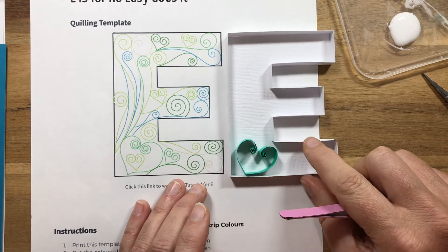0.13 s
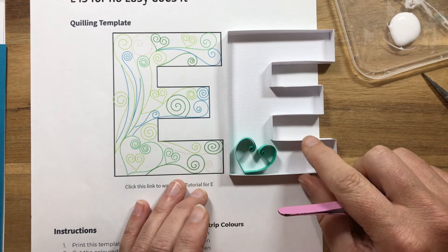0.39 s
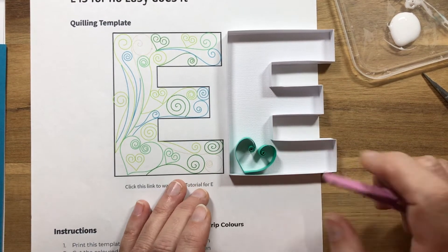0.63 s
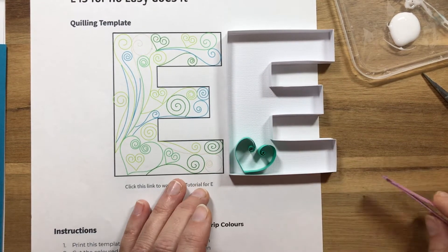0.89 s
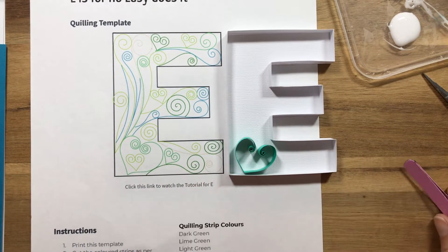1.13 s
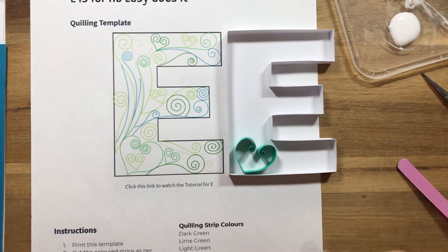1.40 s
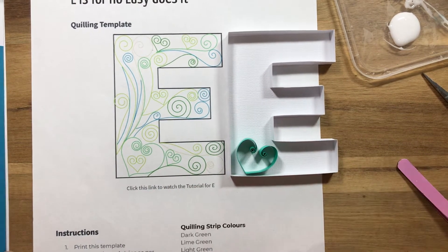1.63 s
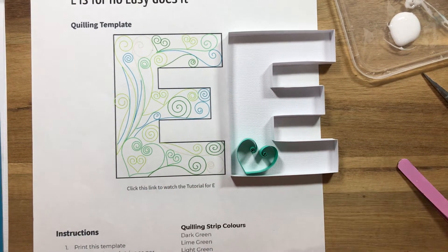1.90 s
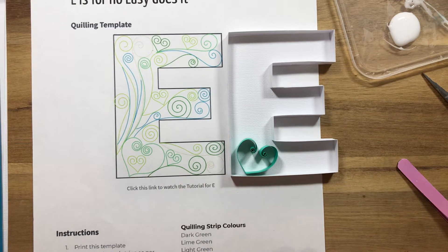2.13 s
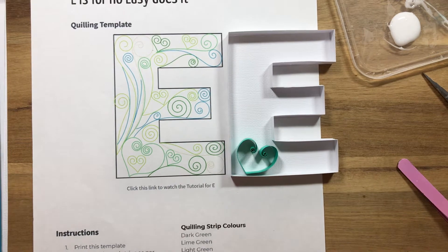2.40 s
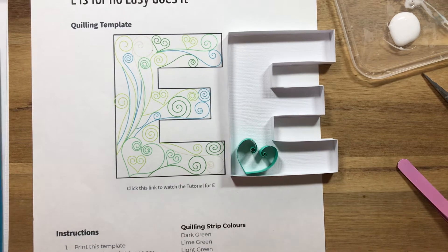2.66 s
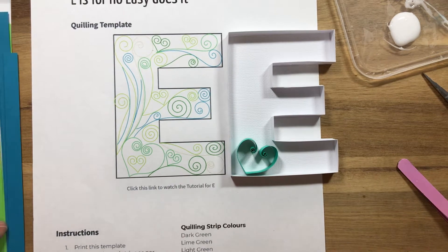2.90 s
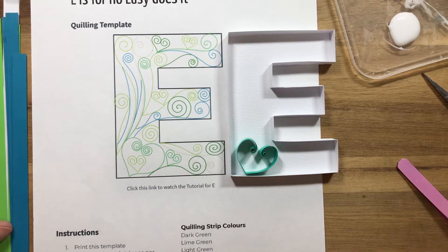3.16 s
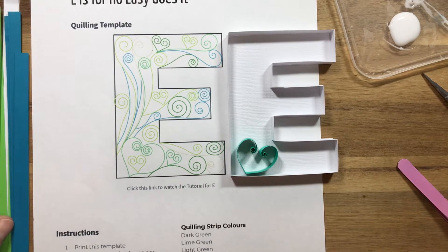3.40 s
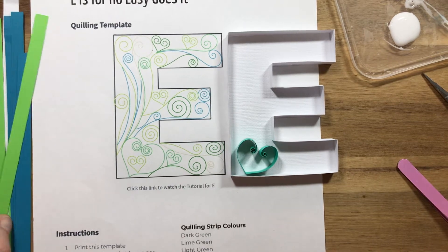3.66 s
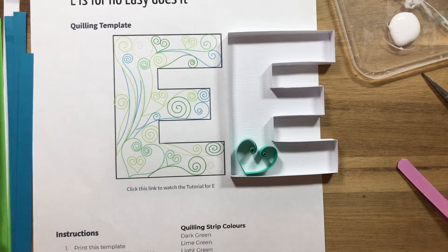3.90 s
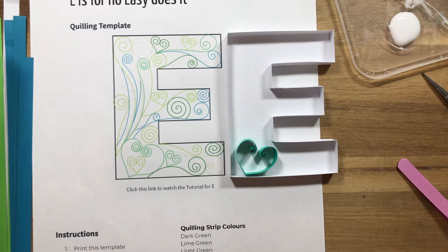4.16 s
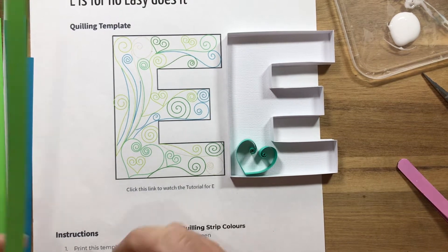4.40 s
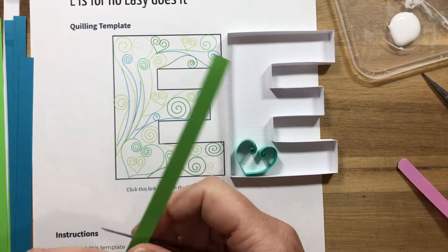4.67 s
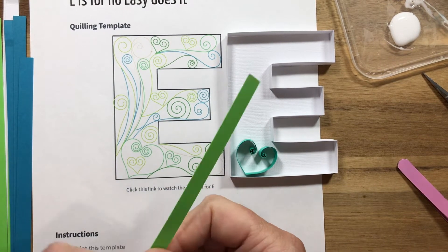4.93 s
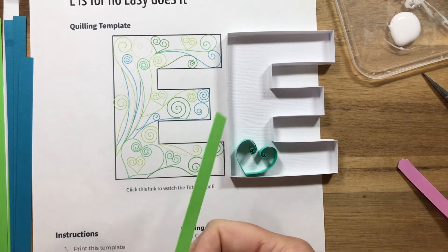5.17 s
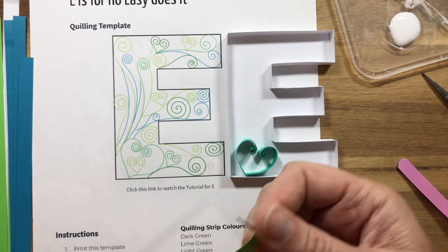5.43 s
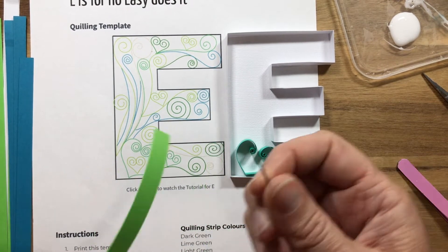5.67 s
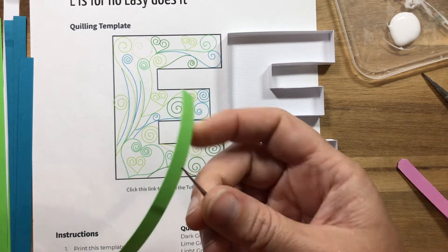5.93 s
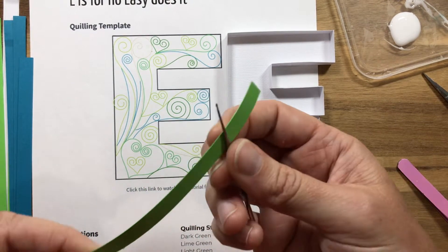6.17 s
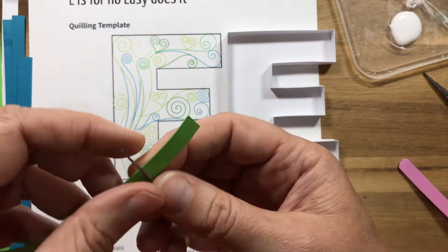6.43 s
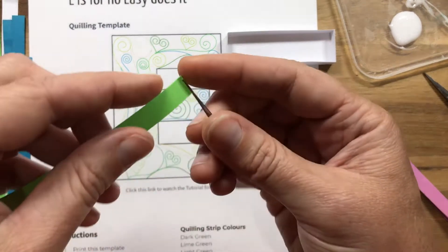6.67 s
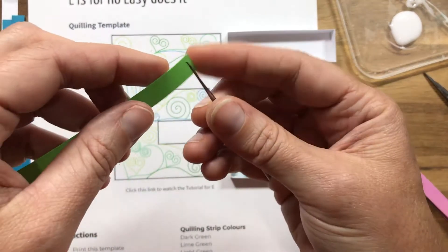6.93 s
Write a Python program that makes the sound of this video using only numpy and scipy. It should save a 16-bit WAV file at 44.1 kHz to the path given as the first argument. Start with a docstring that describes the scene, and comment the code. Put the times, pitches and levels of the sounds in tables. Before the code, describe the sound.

A quiet small room with a steady low hum and soft hiss, heard close up. Faint paper rubbing opens, with one crisp tick at about 0.5 s. At 1.2 s steel tweezers drop on a wooden table, a loud, bright, hard rattle of rapid bounces over within 0.2 s. Soft brushing and a tiny thin whistle follow around 1.5 s. From 2.3 to 4 s paper strips are slid from a stack: dry, papery strokes, dull knocks near 2.5 and 3.2 s, low rubbing on the table and small ticks. Sharp snaps come at 4.05 and 4.15 s, a light woody tap at 4.3 s, then near quiet with faint rustles. Between 5.1 and 5.5 s the strip is drawn through the fingers in swelling strokes with a sinking friction hum. From 5.9 to 7 s irregular small clicks, creases and short scrapes as it is bent round a needle.

```python
"""Steel tweezers drop on a wooden table and rattle to rest: each bounce is a rough contact ringing modes of
table and steel. Around them hands work with paper strips, slid from a stack, drawn through the fingers and
bent round a needle: strokes and a sinking hum of friction noise, and ticks of snapped noise. Under these lie
knocks, a tap and rubbing on the table and thin gliding whistles. All leave a short diffuse tail in a quiet
room of shaped noise with a mains hum."""
import sys
import numpy as np
from scipy import signal
from scipy.io import wavfile
from scipy.ndimage import uniform_filter1d

SR = 44100
rng = np.random.default_rng(int(sys.argv[2]) if len(sys.argv) > 2 else 0)


def convert_level_to_amplitude(level_db):
    """Map a level in decibels to its linear amplitude factor."""
    exponent = np.asarray(level_db, float) / 20
    return 10 ** exponent


def transcribe(signal):
    """Save signal, clipped to [-1, 1], as a 16-bit WAV file at the path in sys.argv[1]."""
    frames = np.atleast_2d(signal).T
    limited = np.clip(frames, -1, 1)
    pcm = np.round(limited * 32767).astype(np.int16)
    wavfile.write(sys.argv[1], SR, pcm)


N = 311346  # length in samples


def evened(x):
    """Scales to rms 1."""
    return x / np.sqrt(np.mean(abs(x) ** 2) + 1e-20)


def add(mix, start_s, sound):
    """Mixes a sound in at a time in seconds."""
    part = mix[round(start_s * SR):][:len(sound)]
    part += sound[:len(part)]


def drift(points_per_s):
    """Slow random wander of rms 1."""
    points = rng.standard_normal(int(N / SR * points_per_s) + 2)
    return evened(signal.resample(points, N))


def resonate(x, hz, width_hz):
    """A resonance of gain 1 that follows the curve hz: shift it down to 0 Hz, smooth, shift back up."""
    turn = np.exp(2j * np.pi * np.cumsum(hz * np.ones(len(x))) / SR)
    r = np.exp(-np.pi * width_hz / SR)
    return 2 * (turn * signal.lfilter([1 - r], [1, -r], x / turn)).real


def resonate_twice(x, hz, width_hz):
    """Two equal resonances in a row, for steeper skirts."""
    return resonate(resonate(x, hz, width_hz), hz, width_hz)


def grains(per_s, spread_db, bed):
    """Friction: a dense bed of noise broken up by fibres that catch and let go."""
    strength = convert_level_to_amplitude(spread_db * np.minimum(rng.exponential(1, N), 4))
    catch = (rng.random(N) < per_s / SR) * strength
    catch = signal.oaconvolve(catch, np.exp(-np.arange(300) / 55.0))[:N]
    return evened(rng.standard_normal(N) * (bed + evened(catch)) * convert_level_to_amplitude(1.8 * drift(60)))


# tonal balance of the room's noise: (frequency [Hz], relative level [dB])
ROOM_SPECTRUM = [(20, -24), (45, 1.5), (75, 1.5), (130, -4.5), (266, -7), (450, -13), (700, -13.5),
                 (950, -12), (1300, -14.5), (2330, -19.5), (3700, -22), (6000, -24), (9080, -28.5),
                 (14000, -27), (15700, -29), (16300, -63)]
# hum and faint whines: (frequency [Hz], mean level [dB rms], waver [dB])
STEADY_TONES = [(100.6, -58.5, 0.27), (56.2, -68, 2.5), (13750, -92, .6)]


def room_tone():
    """Air, distant machines and microphone hiss as shaped noise, with wavering sines for hum and whines."""
    level_db = -62  # rms of the noise above 120 Hz
    hz, _, z = signal.stft(rng.standard_normal(N), SR, nperseg=4096)
    f, db = np.transpose(ROOM_SPECTRUM)
    z *= convert_level_to_amplitude(np.interp(np.log(hz + 1), np.log(f + 1), db))[:, None]
    high = signal.istft(z * (hz > 120)[:, None], SR, nperseg=4096)[1][:N]
    out = signal.istft(z, SR, nperseg=4096)[1][:N] * convert_level_to_amplitude(level_db) / high.std()
    t = np.arange(N) / SR
    for tone_hz, db, waver_db in STEADY_TONES:
        level = convert_level_to_amplitude(db + waver_db * np.clip(drift(4.2), -2, 2))
        out += np.sqrt(2) * level * np.sin(2 * np.pi * (tone_hz * t + rng.random()))
    return out


def room_tail(x):
    """Short diffuse tail of decaying noise; the treble dies first."""
    hz, t, z = signal.stft(rng.standard_normal(SR // 2), SR, nperseg=256)
    t60_s = 0.26 / (1 + hz[:, None] / 9000)
    tail = signal.istft(z * convert_level_to_amplitude(-60 * t / t60_s), SR, nperseg=256)[1]
    tail[:130] = 0  # first reflection after 3 ms
    return signal.fftconvolve(x, tail / np.linalg.norm(tail))[:N]


# thin short glides: (start [s], length [s], start frequency [Hz], frequency neared [Hz], sine level [dB rms])
WHISTLE_GLIDES = [(1.466, 0.06, 2385, 2570, -60), (3.28, 0.074, 2270, 2550, -62),
                  (6.919, 0.026, 1356, 1277, -62.5)]


def whistles():
    """Short near-sine glides that flutter, with a thread of narrow noise on the same pitch."""
    out = np.zeros(N)
    for start, length, start_hz, end_hz, db in WHISTLE_GLIDES:
        u = np.arange(round(length * SR)) / (length * SR)
        hz = end_hz + (start_hz - end_hz) * np.exp(-3.5 * u)
        airy = evened(resonate(rng.standard_normal(len(u)), hz, 90.))
        tone = np.sin(2 * np.pi * np.cumsum(hz) / SR) + 0.34 * airy
        swell = np.sin(np.pi * u) ** 0.24
        flutter = convert_level_to_amplitude(db + 1.7 * drift(59)[:len(u)])
        add(out, start, np.sqrt(2) * flutter * tone * swell)
    return out


# dull knocks through the table: (time of the swell's top [s], relative level [dB], lowest frequency [Hz])
TABLE_KNOCKS = [(2.482, -34.5, 82), (3.101, -50, 250), (3.212, -37, 149)]
# partials of every knock: (multiple of the lowest frequency [ratio], level [dB])
KNOCK_PARTIALS = [(1, 0), (1.6, -9), (2.15, -8.5)]
# the needle handle taps the table once: (time [s], peak level [dB])
HANDLE_TAP = (4.3328, -27.5)
# what the tap rings: (frequency [Hz], relative level [dB], t60 [s])
HANDLE_TAP_MODES = [(292, -5, 0.07), (640, -5.5, 0.042), (1100, -36, 0.022), (1438, 10, 0.027),
                    (1940, -7, 0.016), (2870, 1, 0.02), (3340, -0.5, 0.018), (5000, -3, 0.016),
                    (6200, -6, 0.013)]
# forearms rub the table top, one list per rub: (time [s], level [dB])
FOREARM_RUBS = [
    [(1.4, -60), (2.204, -75.5), (2.27, -97), (2.4, -79)],
    [(2.9, -96), (3.18, -67), (3.868, -68), (4.0, -101)],
    [(5.3, -75), (5.36, -67), (6.0, -82)],
]


def table():
    """Dull swelling knocks, one wooden tap, and low rubbing noise near the table's own resonance."""
    out, t = np.zeros(N), np.arange(SR // 8) / SR
    for s, level_db, hz in TABLE_KNOCKS:
        swell = np.e * t / 0.019 * np.exp(-t / 0.0071)
        partials = sum(convert_level_to_amplitude(db) * np.sin(2 * np.pi * k * hz * t) for k, db in KNOCK_PARTIALS)
        add(out, s - .008, convert_level_to_amplitude(level_db) * swell * partials)

    tap = sum(convert_level_to_amplitude(db - 60 * t / t60) * np.sin(2 * np.pi * hz * t) for hz, db, t60 in HANDLE_TAP_MODES)
    tap = tap * np.minimum(t / 0.00064, 1)  # soft onset
    tap_s, tap_db = HANDLE_TAP
    add(out, tap_s, convert_level_to_amplitude(tap_db) * tap / abs(tap).max())

    rub = evened(resonate_twice(rng.standard_normal(N), 258.0, 105.0))
    for curve in FOREARM_RUBS:
        s, db = np.transpose(curve)
        t = np.arange(s[0], s[-1], 1 / SR)
        add(out, s[0], convert_level_to_amplitude(np.interp(t, s, db)) * rub[round(s[0] * SR):][:len(t)])
    return out


# pulls of the taut strip between the fingers:
# (start [s], length [s], lower mode level [dB], lower mode start [Hz], frequency it nears [Hz])
STRIP_PULLS = [(3.08, .065, -56.5, 1460, 1360), (3.189, .055, -57, 1500, 1410),
               (5.102, 0.1, -66, 1100, 800), (5.188, 0.11, -59, 1170, 750), (5.296, 0.097, -54, 1450, 770),
               (5.394, 0.083, -53.5, 1300, 794)]


def draw_hum():
    """Friction drives two modes of the taut strip; they sink during each pull as the free length grows."""
    upper_hz, upper_sag = 2850., .17  # start, and the share it sinks by
    out, friction = np.zeros(N), grains(per_s=300., spread_db=1.0, bed=3.1)
    for start, length, db, start_hz, end_hz in STRIP_PULLS:
        u = np.arange(round(length * SR)) / (length * SR)
        low_hz = start_hz + (end_hz - start_hz) * np.tanh(2.2 * u)
        high_hz = upper_hz * (1 - upper_sag * u)
        rub = friction[round(start * SR):][:len(u)]
        lower = evened(resonate_twice(rub, low_hz, 260.0))
        upper = evened(resonate_twice(rub, high_hz, 420.))
        swell = np.sin(np.pi * u) ** 0.24
        add(out, start, convert_level_to_amplitude(db) * swell * (lower + convert_level_to_amplitude(-3.) * upper))
    return out


# the curl of the strip, which rings in the ticks and colours the strokes:
# (time [s], resonance [Hz], strength in the strokes [dB])
STRIP_CURL = [(0, 5500, 3), (2.35, 5300, 2), (2.62, 5050, 3), (2.8, 5570, -1.5), (3.2, 5300, 5),
              (3.56, 4770, 4), (3.7, 5450, 2), (3.8, 4620, 14), (3.99, 4800, 13.5), (4.04, 4800, 3),
              (4.2, 5000, 7), (4.66, 5000, 15), (5.0, 5800, 5), (5.46, 5550, 7.5), (5.65, 6100, 13),
              (5.99, 6900, 11), (6.04, 6100, 16), (6.17, 5900, 14), (6.24, 4600, 9), (6.36, 4800, 9),
              (6.39, 5880, 19), (6.55, 5740, 1.5), (7.06, 5500, 16)]
# ticks of nails, needle and paper creases:
# (time [s], peak level of the middle [dB], low tap [Hz], low tap level [dB], bright edge level [dB])
# low tap and edge are rms levels against the middle
PAPER_TICKS = [(0.472, -28.5, 1590, -17, -33), (1.051, -47, 3440, 2.5, -16), (1.5356, -41, 1870, -16, -2),
               (1.5464, -39, 2290, -10, 0), (2.3186, -41.5, 1230, -18, -10), (2.3271, -41.5, 3000, -5, -8),
               (2.4516, -46, 974, -23, -17), (2.7681, -40, 3240, -14, -6), (2.9467, -45, 2000, -5, -12),
               (3.2255, -33, 3000, -14, -12), (3.703, -39.5, 3240, -6, -8),
               (3.8138, -43.5, 3370, -12, -6.5), (4.011, -37, 1500, -22, -12),
               (4.0485, -40.5, 1030, -12, 3), (4.0562, -32.5, 2830, -17, 0),
               (4.1403, -29.5, 1980, -12, -0.5), (4.3886, -51.5, 1420, -1, -22),
               (4.6266, -47, 1510, -4.5, -18), (4.7174, -49, 1530, -2, -16), (5.589, -45, 668, -17, -3),
               (5.914, -38, 2160, -7, -12), (5.928, -44, 657, -15, -14), (6.0152, -38, 2520, -17, -23),
               (6.0334, -40, 1780, 0, -15), (6.0487, -38.5, 1500, -18, -12), (6.0865, -39, 1150, -0.5, -11),
               (6.161, -36, 2060, -15, -8), (6.5036, -38, 2120, 0, -15), (6.562, -40, 2290, -7, -9),
               (6.6757, -34.5, 700, -5, -10), (6.756, -37.5, 1700, -3, -5), (6.768, -31, 1020, -6, -11),
               (6.7744, -39, 947, -6, -14), (6.8405, -40, 1100, -9, -11), (6.9486, -38.5, 937, -0.5, -14),
               (6.9667, -39, 934, -10, -15)]


def ticks():
    """A snap of noise with a short ring of the curled strip, a low tap and a bright edge."""
    t60_s = 0.025
    out, t = np.zeros(N), np.arange(2600) / SR
    chance = rng.standard_normal((len(PAPER_TICKS), len(t)))
    for (s, peak_db, low_hz, low_db, edge_db), noise in zip(PAPER_TICKS, chance):
        ring_hz = np.interp(s, *np.transpose(STRIP_CURL)[:2])
        decay = convert_level_to_amplitude(-60 * t / t60_s) + .6 * np.exp(-t / 0.00096)
        snap = noise * decay * np.minimum(t / 0.00019, 1)
        body = evened(resonate(snap, 6100.0, 3800.0))
        ring = evened(resonate(snap, ring_hz, 600.0))
        middle = evened(body + convert_level_to_amplitude(1.5) * ring)
        low = evened(resonate_twice(snap, low_hz, 1240.0))
        edge = evened(resonate_twice(snap, 12000.0, 6500.0))
        tick = middle + convert_level_to_amplitude(low_db) * low + convert_level_to_amplitude(edge_db) * edge
        add(out, s - .0005, convert_level_to_amplitude(peak_db) * tick / abs(middle).max())
    return out


# strokes of paper on paper and skin; rise and fall are the times to 10.8 dB below the peak:
# (time of the peak [s], rise [s], fall [s], relative level [dB], brightness above 9.8 kHz [dB])
PAPER_STROKES = [(0.01, 0.022, 0.12, -57.5, -7.5), (0.178, 0.072, 0.027, -63, -1),
                 (0.615, 0.029, 0.032, -61.5, -4), (1.062, 0.018, 0.048, -65, -7),
                 (1.546, 0.0081, 0.056, -55.5, 0.5), (1.639, 0.033, 0.073, -51, -4.5),
                 (1.9, 0.084, 0.082, -61.5, -4), (2.345, 0.021, 0.036, -50.5, -4),
                 (2.538, 0.055, 0.048, -60.5, -5), (2.624, 0.02, 0.082, -53, -3),
                 (2.775, 0.008, 0.043, -48, -5), (2.825, 0.049, 0.017, -46, -0.5),
                 (2.95, 0.056, 0.13, -59.5, -3.5), (3.098, 0.049, 0.049, -50, 4.5),
                 (3.145, 0.038, 0.035, -51.5, 1), (3.22, 0.03, 0.026, -43, -8.5),
                 (3.291, 0.023, 0.072, -61, -4), (3.414, 0.05, 0.054, -50, -6.5),
                 (3.505, 0.036, 0.036, -53.5, -7), (3.556, 0.038, 0.04, -47.5, -7.5),
                 (3.705, 0.029, 0.011, -52, 6), (3.827, 0.061, 0.04, -54, -2),
                 (3.887, 0.025, 0.0087, -47.5, -8), (3.959, 0.049, 0.042, -49.5, -4),
                 (4.1, 0.055, 0.044, -63, 0), (4.216, 0.043, 0.079, -65.5, 7),
                 (4.659, 0.037, 0.069, -63, -22), (4.777, 0.024, 0.1, -61.5, -0.5),
                 (4.943, 0.048, 0.03, -66.5, 3.5), (5.238, 0.1, 0.11, -59, 12),
                 (5.346, 0.09, 0.072, -54, 2.5), (5.462, 0.081, 0.017, -47.5, 3),
                 (5.594, 0.0059, 0.026, -56, 10.5), (5.655, 0.038, 0.082, -60.5, 9),
                 (5.819, 0.04, 0.047, -64.5, -1), (5.952, 0.019, 0.036, -52, -8),
                 (6.08, 0.022, 0.045, -50.5, -3), (6.158, 0.018, 0.017, -49.5, -2),
                 (6.344, 0.19, 0.2, -60.5, -1), (6.511, 0.015, 0.016, -51, -4),
                 (6.557, 0.025, 0.09, -60.5, -3), (6.687, 0.013, 0.039, -58.5, 1),
                 (6.765, 0.0075, 0.017, -48, 4), (6.85, 0.036, 0.17, -65, -7),
                 (6.96, 0.0089, 0.012, -51, 3)]
# the strokes' low body, below 4.1 kHz, against their middle: (time [s], level [dB])
STROKE_BODY = [(0, 1), (1.5, -3.5), (2.35, -5.5), (2.8, -10.5), (3.1, -1.5), (3.25, -2.5), (3.6, -10),
               (3.8, 0), (4.3, -8), (5.2, -2.5), (5.45, 5.5), (5.6, -21), (5.95, -15), (6.1, 2), (7.06, 0)]


def slides():
    """Friction noise in strokes, coloured by two resonances of the curled strip, a bright edge and a low body."""
    friction = grains(per_s=900., spread_db=2., bed=3.)
    hz, t, z = signal.stft(friction, SR, nperseg=256, noverlap=192)
    f = hz[:, None]
    high = 1 / (1 + np.exp(-(f - 9800) / 700))
    low = 1 / (1 + np.exp((f - 4100) / 200))
    bass_cut_db = 16 / (1 + (f / 1100) ** 8)
    top_cut_db = 25 / (1 + np.exp(-(f - 15900) / 120))

    power = np.zeros(z.shape)
    for s, rise, fall, level_db, bright_db in PAPER_STROKES:
        u = np.where(t < s, (s - t) / rise, (t - s) / fall)
        colour_db = high * bright_db - bass_cut_db - top_cut_db
        power += convert_level_to_amplitude(2 * colour_db) * convert_level_to_amplitude(2 * (level_db - 10.8 * u ** 1.25))

    s, curl_hz, curl_db = np.transpose(STRIP_CURL)
    curl_hz, curl_db = np.interp(t, s, curl_hz), np.interp(t, s, curl_db)
    first = np.exp(-((f - curl_hz) / 400) ** 2)
    second = np.exp(-((f - 1.815 * curl_hz) / 700) ** 2)
    curl = convert_level_to_amplitude(curl_db * (first + 0.47 * second))

    # random patches in time and pitch keep the noise uneven
    patches = rng.standard_normal(z.shape[::-1]).T
    patches = uniform_filter1d(patches, size=4, axis=0)
    patches = evened(uniform_filter1d(patches, size=30, axis=1))

    body_db = low * np.interp(t, *np.transpose(STROKE_BODY))
    level_db = 5.0 - 0.31 * curl_db  # a strong curl takes from the rest
    z *= np.sqrt(power) * curl * convert_level_to_amplitude(body_db + level_db + 2.26 * patches)
    return signal.istft(z, SR, nperseg=256, noverlap=192)[1][:N]


# bounces of the tweezers: (time [s], peak level [dB], steel arms' level [dB], table top's level [dB])
# arms and table top are offsets to the modes above 4 kHz and under 1.6 kHz
TWEEZER_BOUNCES = [(1.176, -17.5, -33, -7.5), (1.188, -23, -25, -14), (1.205, -10.5, -7, -0.5),
                   (1.215, -25, -2, 1), (1.2255, -11.5, -1, -29), (1.2339, -19.5, -15, -30),
                   (1.2419, -16.5, -20, 7), (1.2501, -19.5, -19, -18), (1.2663, -22, -25, -20),
                   (1.272, -18.5, -22, -5), (1.2889, -20, -25, -30), (1.293, -13.5, -15, -2.5),
                   (1.2987, -20.5, 2, -14), (1.3079, -21.5, 3.5, 3), (1.3173, -11.5, 0, 0),
                   (1.324, -16, -8, 3), (1.338, -21, 3, -25), (1.344, -19, -4, -6), (1.3507, -27, -11, 5),
                   (1.362, -27, -5, 10)]
# table top under 1.6 kHz, pressed steel, then the free arms above 4 kHz:
# (frequency [Hz], relative level [dB], t60 [s])
TWEEZER_MODES = [(139, -14.5, 0.061), (211, -12, 0.073), (296, -4, 0.116), (540, -11, 0.055),
                 (1018, 10.5, 0.039), (1330, -7, 0.13), (1540, -0.5, 0.061), (1880, 7.5, 0.046),
                 (2430, -4, 0.049), (2447, 10.5, 0.029), (2720, 9, 0.029), (3060, -10, 0.019),
                 (3340, 1, 0.054), (3700, -12, 0.033), (4140, 5, 0.009), (4490, -0.5, 0.051),
                 (5250, 6, 0.026), (5580, -23, 0.4), (6100, 0, 0.048), (6900, -18, 0.028),
                 (7200, -17, 0.17), (7700, -18.5, 0.33), (8950, -19, 0.15), (11350, -19, 0.018),
                 (12700, -22, 0.047), (15200, -45, .05)]


def tweezers():
    """Each bounce is a short rough contact that cracks and rings the modes of table and steel in its own mix."""
    contact_s = 0.0032  # decay constant of the chatter of steel on wood
    out, t = np.zeros(N), np.arange(SR // 4) / SR
    short = t[:1200]
    hz, db, t60 = np.transpose(TWEEZER_MODES)[:, :, None, None]
    decay = convert_level_to_amplitude(-60 * t / t60[:, 0])
    chance = rng.standard_normal((len(TWEEZER_BOUNCES), 6 * len(TWEEZER_MODES) + 2400))
    steep = signal.butter(5, 800, "highpass", fs=SR, output="sos")
    for (s, peak_db, arms_db, table_db), draw in zip(TWEEZER_BOUNCES, chance):
        # each mode is a cluster of three
        spot, shift = draw[:6 * len(hz)].reshape(2, -1, 3, 1)
        crack_noise, chatter_noise = draw[-2400:-1200], draw[-1200:]
        level_db = db + arms_db * (hz > 4000) + table_db * (hz < 1600) + 2.2 * spot
        # damped modes come in loose clusters that move with the struck spot
        split_hz = hz + 3.75 * shift / t60
        waves = np.sin((2 * np.pi * split_hz * t).astype(np.float32))
        rings = decay * (convert_level_to_amplitude(level_db) * waves).sum(1)

        crack = convert_level_to_amplitude(arms_db + 3.0 - 60 * short / 0.027) * resonate(crack_noise, 5000., 3500.0)
        upper = rings[4:].sum(0)
        upper[:1200] += crack * np.linspace(1, 0, len(crack))
        bass = rings[:4].sum(0) * (1 - np.exp(-t / 0.0011))  # bass builds slowly
        ring = signal.sosfilt(steep, upper) + bass

        hit = 5.2 * (short == t[40])  # one sharp click within the chatter
        contact = (chatter_noise + hit) * np.exp(-short / contact_s)
        contact = contact * np.minimum(0.35 + short / 0.0013, 1)
        sound = signal.fftconvolve(ring, contact)[:len(t)]
        add(out, s - .0008, convert_level_to_amplitude(peak_db) * sound / abs(sound).max())
    return out


def scene():
    """All sources close to one microphone, with the room's tail 14 dB under them."""
    hands = whistles() + table() + draw_hum() + ticks() + slides() + tweezers()
    return (hands + convert_level_to_amplitude(-14) * room_tail(hands) + room_tone())[None]


def roll_off(x):
    """The treble ends steeply here."""
    return signal.sosfilt(signal.butter(12, 16980, fs=SR, output="sos"), x)


def record(dry):
    """Delivers the finished mix."""
    return roll_off(dry)


dry = scene()
out = record(dry)
transcribe(out)
```